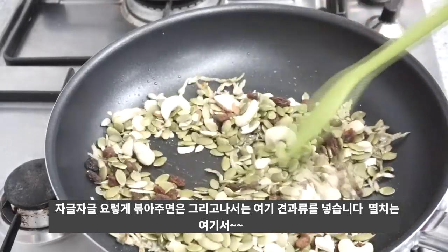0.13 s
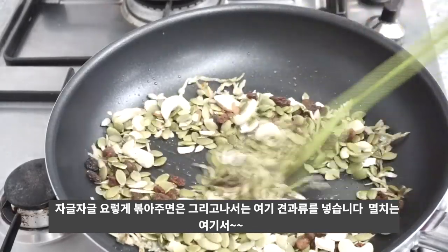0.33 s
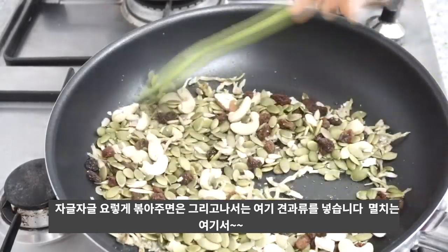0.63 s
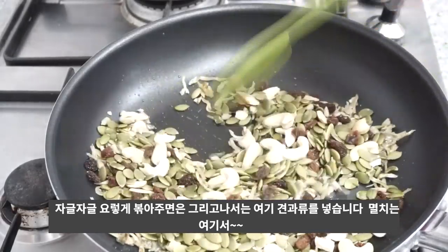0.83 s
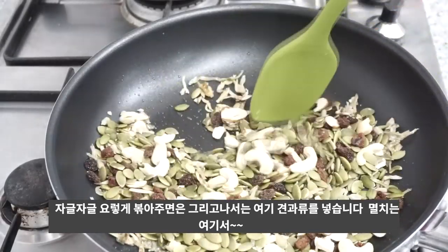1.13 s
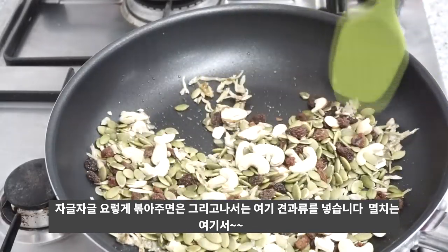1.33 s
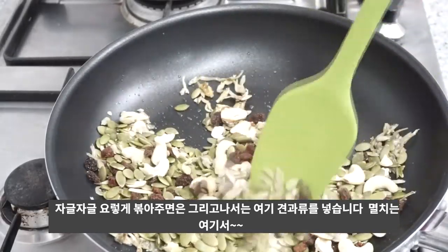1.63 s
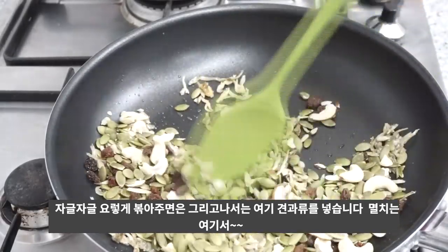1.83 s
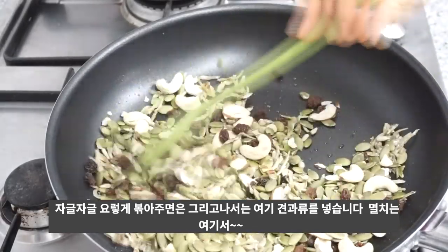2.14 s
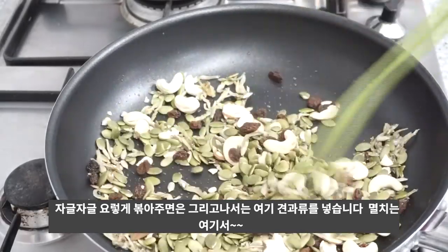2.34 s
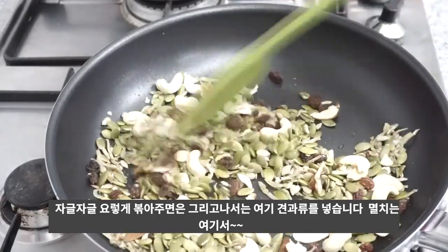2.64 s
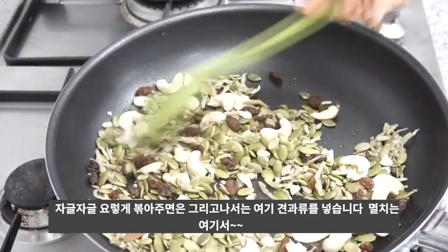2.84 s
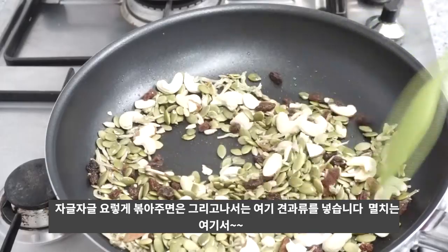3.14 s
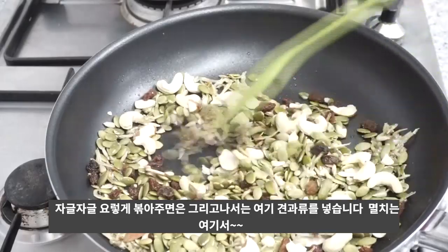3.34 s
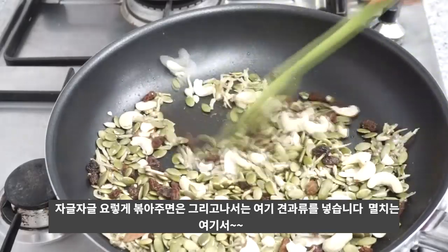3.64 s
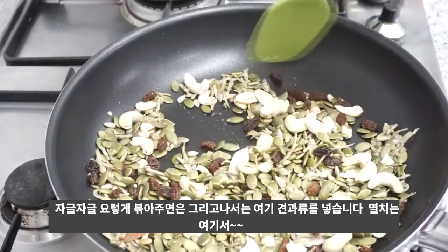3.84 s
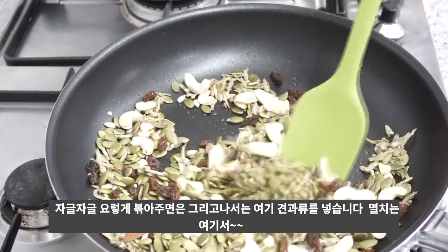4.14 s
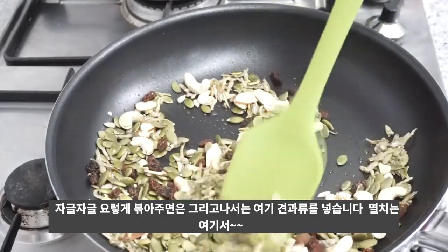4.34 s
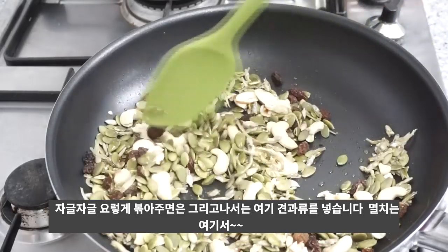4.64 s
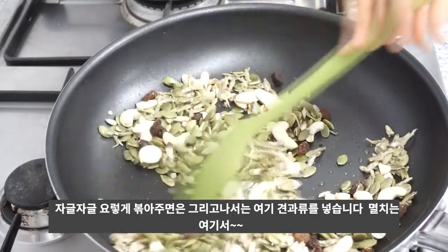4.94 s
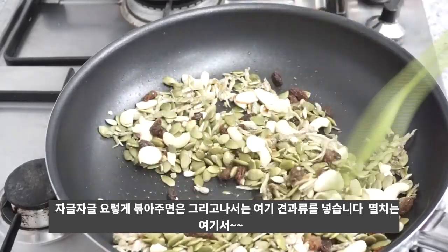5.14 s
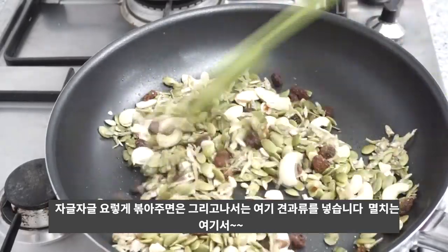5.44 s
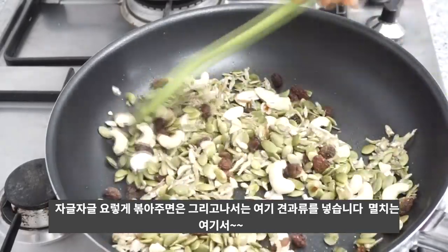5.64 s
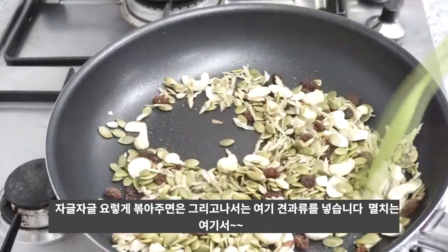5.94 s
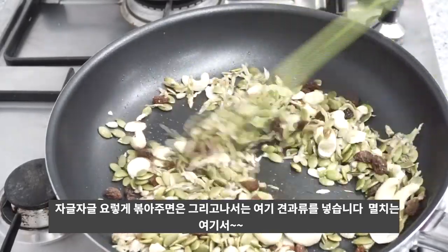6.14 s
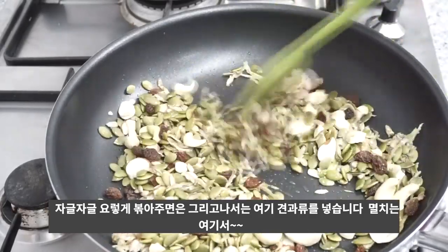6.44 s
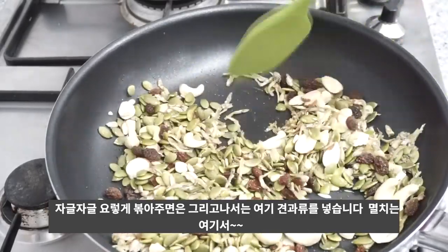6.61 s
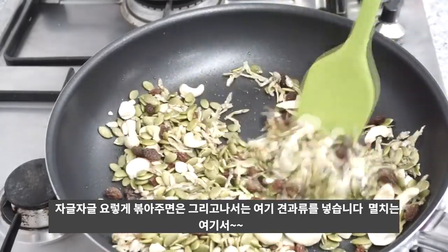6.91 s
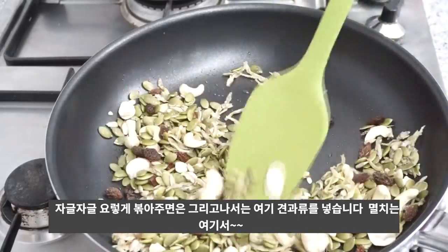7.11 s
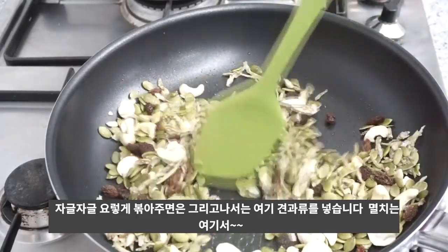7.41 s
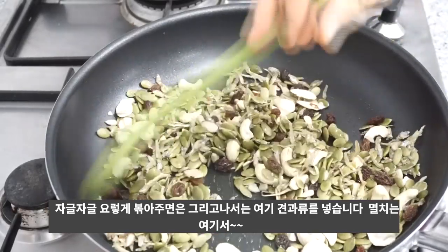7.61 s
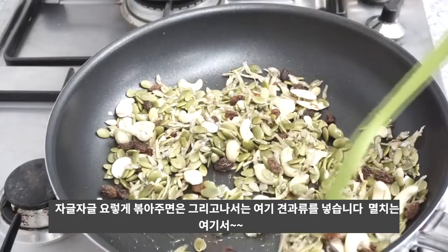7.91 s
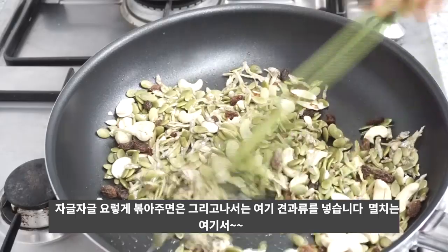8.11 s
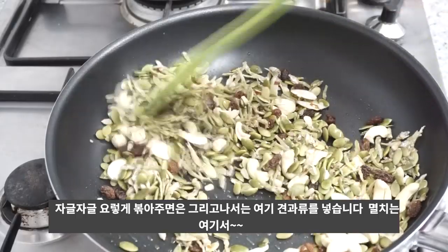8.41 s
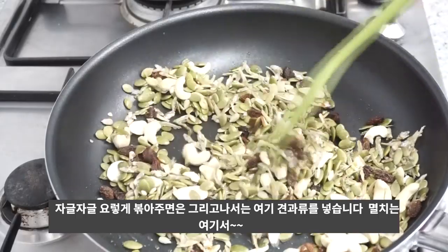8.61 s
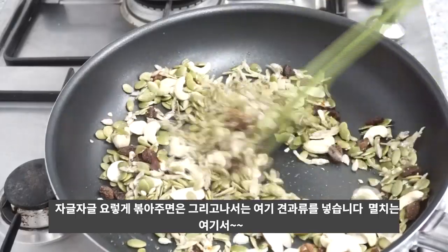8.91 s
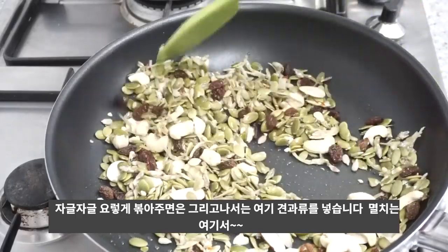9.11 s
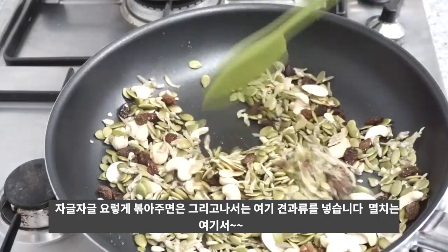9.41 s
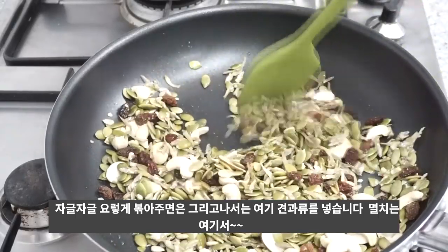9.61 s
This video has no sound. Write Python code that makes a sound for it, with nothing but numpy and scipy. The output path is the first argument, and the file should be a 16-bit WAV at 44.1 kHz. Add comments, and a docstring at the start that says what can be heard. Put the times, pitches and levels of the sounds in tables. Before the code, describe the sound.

Close-up stirring in a metal pan: irregular nutty clatter, papery seed rustle, dull spatula thuds and sharp little spits over a quiet sizzle.

```python
"""Stirring nuts in a frying pan

Nuts and small dried fish are stirred with a soft spatula in a frying pan on a gas ring.
Blade: shaken low pan modes, thudding and dragging. Nuts: random and timed contacts ring the pan floor.
Seeds and fish: rubbing grains and pitched ticks. Hot oil: dense clicks sizzle, filtered snaps spit.
Below lie low rumble and hush, shaped from noise, and the short reflections of a small kitchen."""
import sys
import numpy as np
from scipy import signal
from scipy.fft import rfft, irfft, next_fast_len
from scipy.io import wavfile

SR = 44100
rng = np.random.default_rng(int(sys.argv[2]) if len(sys.argv) > 2 else 0)


def output_pcm(signal):
    """Save a mono or channel-first signal as 16-bit PCM at the path in sys.argv[1].

    Samples are clipped to [-1, 1] before scaling.
    """
    pcm = np.clip(np.atleast_2d(signal).T, -1, 1) * 32767
    wavfile.write(sys.argv[1], SR, np.round(pcm).astype(np.int16))


def invert_db(level):
    """Linear amplitude ratio for a level in decibels (20 dB per decade), elementwise."""
    return 10 ** (np.asarray(level, dtype=float) / 20)


N = 430416


def rms_one(x):
    """Scales to rms 1."""
    return x / np.sqrt(np.mean(x ** 2) + 1e-20)


def in_time(rows):
    """Columns after the first (t/s), joined by straight lines, at every sample."""
    t_s, *columns = np.transpose(rows)
    return [np.interp(np.arange(N) / SR, t_s, column) for column in columns]


def coloured(x, points):
    """Shapes a spectrum by gains (f/Hz, level/dB) joined over log frequency."""
    size = next_fast_len(N)
    hz = np.maximum(np.fft.rfftfreq(size, 1 / SR), 1)
    point_hz, point_db = np.transpose(points)
    gain_db = np.interp(np.log(hz), np.log(point_hz), point_db)
    return irfft(rfft(x, size) * invert_db(gain_db), size)[:N]


def band(x, low_hz, high_hz):
    """Gentle band-pass."""
    return signal.sosfilt(signal.butter(2, [low_hz, high_hz], "band", fs=SR, output="sos"), x)


def drift(rate_hz):
    """Slow noise of rms 1: two equal real poles at rate_hz, run at every 40th sample."""
    step, settle = 40, 2000
    r = np.exp(-2 * np.pi * rate_hz * step / SR)
    noise = rng.standard_normal(N // step + settle + 2)
    slow = signal.lfilter([1], [1, -2 * r, r * r], noise)[settle:]
    return np.interp(np.arange(N) / step, np.arange(len(slow)), rms_one(slow))


def ring(clicks, hz, t60_s):
    """Damped mode: a unit click starts a decaying sine of height 1."""
    r, w = invert_db(-60 / (t60_s * SR)), 2 * np.pi * hz / SR
    return signal.lfilter([0, np.sin(w)], [1, -2 * r * np.cos(w), r * r], clicks + 1e-18)


def grains(per_s, spread_db):
    """Random clicks of either sign; sizes in dB follow a capped exponential law."""
    sizes = invert_db(spread_db * np.minimum(rng.exponential(1, N), 5)) * rng.choice([-1, 1], N)
    return sizes * (rng.random(N) < per_s / SR)


def add_at(out, t_s, sound):
    """Adds a short sound in place at t_s."""
    at = round(t_s * SR)
    out[at:at + len(sound)] += sound[:N - at]


def swells(crest_s, swell_s, ebb_s, db):
    """Summed power, every 2 ms, of events with a broad crest and steep ends."""
    swing_db, rounding = 20, 1.39      # swing_db is lost over one swell or ebb time
    late_s = np.arange(0, N / SR, .002)[:, None] - crest_s
    away = np.maximum(late_s / ebb_s, -late_s / swell_s)
    return np.sum(invert_db(db - swing_db * away ** rounding) ** 2, axis=1)


# blade landings on the pan floor: t/s, relative peak level/dB, rocking time/s (75 dB down),
# relative level of modes over 250 Hz/dB
THUDS = [(0.202, -26, 0.34, 23), (0.35, -37, 0.16, -26), (0.714, -31, 0.4, -27), (0.742, -39, 0.15, -4),
         (1.402, -33.5, 0.099, 17), (2.215, -37.5, 0.19, -10), (2.529, -41.5, 0.16, 7),
         (2.739, -51, 0.17, -14), (2.891, -30, 0.17, -9), (3.26, -37, 0.14, -8), (3.585, -30, 0.2, -19),
         (3.629, -40, 0.16, -21), (3.684, -46, 0.12, -10), (4, -33.5, 0.074, 9), (4.496, -36, 0.11, -8),
         (4.872, -32, 0.12, -13), (4.89, -33.5, 0.16, -18), (5.292, -44, 0.2, -13), (5.71, -35, 0.28, -19),
         (6.038, -42, 0.27, 7), (6.412, -28, 0.13, -19), (6.435, -22, 0.095, -16), (6.791, -24.5, 0.27, -1),
         (7.342, -35.5, 0.13, -2), (7.693, -27.5, 0.64, -9), (8.088, -42, 0.15, -4),
         (8.433, -30.5, 0.72, 1), (8.823, -40, 0.15, -1), (8.879, -29.5, 0.15, -10),
         (9.227, -24.5, 0.068, -11), (9.617, -27, 0.14, 9)]
# blade pushes through the heap: crest t/s, swell/s, ebb/s, relative nut rattle level/dB,
# relative seed rustle level/dB
STROKES = [(0.0, .05, 0.041, -22.5, -46), (0.12, 0.26, 0.18, -31.5, -26.5),
           (0.218, 0.068, 0.04, -22.5, -32.5), (0.34, 0.26, 0.17, -35.5, -28),
           (0.45, 0.19, 0.051, -32.5, -33.5), (0.82, 0.25, 0.32, -43, -37.5),
           (1.13, 0.086, 0.2, -43.5, -42.5), (1.6, 0.27, 0.062, -42, -45), (1.85, 0.99, 0.3, -51, -43.5),
           (2.04, 0.035, 0.17, -36.5, -33), (2.32, 0.28, 0.14, -41.5, -39.5), (2.65, 0.26, 0.3, -39, -36),
           (3.04, 0.32, 0.23, -39, -39.5), (3.3, 0.2, 0.31, -43, -41), (3.72, 0.19, 0.14, -36, -35.5),
           (4.19, 0.12, 0.085, -41.5, -40), (4.33, 0.097, .2, -44.5, -69), (4.68, 0.31, 0.19, -42.5, -44),
           (5.03, 0.11, 0.14, -40, -39.5), (5.11, 0.19, 0.085, -40, -41.5),
           (5.2, 0.031, 0.19, -43.5, -43.5), (5.41, 0.13, 0.28, -38, -39), (5.83, 0.18, 0.15, -34, -37),
           (6.12, 0.11, 0.31, -41.5, -42.5), (6.26, 0.54, 0.24, -38.5, -42), (6.57, 0.39, 0.11, -38, -43.5),
           (7.01, 0.18, 0.2, -40, -54), (7.26, 0.043, 0.15, -45, -58), (7.48, 0.15, 0.19, -35, -36),
           (7.88, 0.17, 0.24, -41.5, -36.5), (8.22, 0.21, 0.14, -36, -34.5),
           (8.61, 0.38, 0.23, -34.5, -42.5), (9.02, 0.25, 0.25, -36, -38), (9.42, 0.27, 0.14, -31.5, -39),
           (9.76, 0.2, .1, -36.5, -43)]
# seeds tumble off the blade: t/s, relative level/dB, ebb/s
SPILLS = [(0.34, -37, .04), (0.537, -31.5, 0.13), (1.096, -34.5, 0.07), (1.486, -40.5, 0.29),
          (1.922, -38, 0.1), (2.062, -28, 0.025), (2.225, -37.5, 0.15), (2.766, -35, 0.07),
          (2.955, -37, 0.081), (3.447, -28.5, 0.068), (3.535, -38.5, .07), (3.93, -41, 0.16),
          (4.503, -48, 0.15), (4.897, -42.5, 0.2), (5.597, -36.5, 0.096), (6.441, -27.5, 0.022),
          (6.617, -43, 0.048), (6.805, -43, 0.095), (7.889, -30, 0.03), (8.535, -36, 0.12),
          (9.254, -36, 0.046), (9.368, -36, 0.045), (9.617, -38, 0.035)]


def stirring():
    """Strokes, spills and landings set rattle, its upper modes, drag and rustle, in dB over time."""
    spill_rattle_db, push_drag_db = -11, -20.5               # against the spill; against the rattle
    jump_db, jump_swell_s, jump_ebb_s = -11, 0.048, 0.12     # nuts jump at a landing, against the thud
    drag_on_db, drag_swell_s, drag_ebb_s = -8.5, 0.04, 0.1   # blade drags on after it, against the thud
    rest_rattle_db, rest_rustle_db, rest_drag_db = -68, -50.5, -65.5   # heap settling between strokes
    crest_s, swell_s, ebb_s, push_db, seed_db = np.transpose(STROKES)
    spill_s, spill_db, spill_ebb_s = np.transpose(SPILLS)
    land_s, land_db = np.transpose(THUDS)[:2]

    pushed = swells(crest_s, swell_s, ebb_s, push_db)
    spilled = swells(spill_s, 0.44 * spill_ebb_s, spill_ebb_s, spill_db)
    jumped = swells(land_s + 0.024, jump_swell_s, jump_ebb_s, land_db + jump_db)
    dragged_on = swells(land_s + 0.019, drag_swell_s, drag_ebb_s, land_db + drag_on_db)
    rubbed = swells(crest_s, swell_s, 1.12 * ebb_s, seed_db)

    rattle = pushed + invert_db(spill_rattle_db) ** 2 * spilled + invert_db(rest_rattle_db) ** 2 + jumped
    drag = invert_db(push_drag_db) ** 2 * pushed + invert_db(rest_drag_db) ** 2 + dragged_on
    rustling = rubbed + spilled + invert_db(rest_rustle_db) ** 2
    levels_db = 10 * np.log10(np.c_[rattle, drag, rustling])
    rattle_db, drag_db, rustle_db = in_time(np.c_[np.arange(len(drag)) * .002, levels_db])
    hard_db = -1.54 + 0.31 * (rustle_db - rattle_db)   # more seeds against nuts: brighter
    return rattle_db, hard_db, drag_db, rustle_db


# low modes of the pan on its grate: f/Hz, level/dB, t60/s before scaling
PAN_LOW = [(95, 4, 0.15), (168.6, 3.5, 0.14), (209, 6.5, 0.1), (280, -2.5, 0.088), (335, -6, 0.1),
           (404, -13, 0.07), (494, 1.5, 0.088)]


def blade(drag_db):
    """The soft blade judders over the pan floor and shakes its low modes; each landing is a dull thud."""
    judder = grains(600.0, spread_db=-0.5)
    drag = sum(invert_db(db) * ring(judder, hz, 0.38 * t60_s) for hz, db, t60_s in PAN_LOW)
    out = invert_db(drag_db - 0.65) * rms_one(band(drag, 111, 610))
    t = np.arange(int(.3 * SR)) / SR
    shakes = rng.standard_normal((len(THUDS), len(t)))
    for (land_s, peak_db, rock_s, upper_db), shake in zip(THUDS, shakes):
        rocking = 0.59 * shake * invert_db(-75.0 * t / max(rock_s, .02))
        push = 17.0 * (t == 0) + rocking      # the blow, then the pan rocks on the grate
        thud = np.zeros(len(t))
        for hz, db, t60_s in PAN_LOW:
            mode_db = db + (hz > 250) * (upper_db + 14.5)
            thud += invert_db(mode_db) * ring(push, hz, 0.74 * t60_s)
        thud = band(thud, 77, 730)
        add_at(out, land_s, invert_db(peak_db + 0.8) * thud / np.abs(thud).max())
    return out


# nuts knock on the metal: t/s, relative peak level/dB, relative brightness/dB, centre f/Hz
KNOCKS = [(0.166, -7.5, -38, 1150), (0.201, -8.5, -38, 1210), (0.221, -15, -38, 1290),
          (0.324, -14, 3, 1900), (0.83, -24, -13, 1200), (0.861, -26, -15, 1000), (0.962, -30, -8, 2000),
          (1.089, -23, 0, 2600), (0.74, -15, -12, 1160), (1.096, -16.5, -5, 2000), (1.128, -21.5, -5, 2000),
          (1.167, -29, -8, 1300), (1.277, -30, -5, 1170), (1.403, -16.5, -5, 1600), (2.019, -7, -20, 1850),
          (2.043, -15, -8, 1300), (2.06, -11.5, -21, 1900), (2.08, -17, -16, 1900), (2.115, -19, -10, 2000),
          (2.205, -19, -5, 3000), (2.365, -23, -2, 2300), (2.678, -19, -6, 3200), (2.331, -20.5, -6, 2390),
          (2.476, -25, -6, 1910), (2.508, -26, 0, 2240), (2.892, -26, -17, 1720), (2.914, -20, -24, 1020),
          (3.416, -20, -20, 1310), (3.43, -11.5, -7, 1950), (3.45, -16, -5, 2000), (3.53, -28, -3, 1120),
          (3.591, -22.5, -30, 1030), (3.713, -19, -21, 1320), (3.913, -15.5, -7, 2000),
          (4.002, -17.5, -7, 1690), (4.172, -22, -2, 2070), (4.195, -24, -4, 2600), (4.22, -23.5, -8, 980),
          (4.49, -24, -2, 1350), (4.713, -24, 0, 3000), (4.872, -25, -13, 1720), (4.891, -20, -8, 1690),
          (5.179, -23, -17, 2290), (5.2, -18, -3, 2300), (5.221, -22, -2, 3200), (5.398, -23, -18, 850),
          (5.549, -24.5, -18, 815), (5.594, -21, -2, 3100), (5.634, -26, -2, 3100),
          (5.688, -24.5, -6, 1140), (6.384, -23, -11, 1230), (6.397, -23, -13, 1150),
          (6.4164, -13.5, -33, 980), (6.434, -8.5, -3, 1200), (6.44, -9.5, -14, 900), (6.45, -16, -5, 1300),
          (6.472, -17, -11, 1100), (6.493, -21, 0, 3100), (6.535, -21, -20, 1000), (6.591, -32, -15, 1200),
          (6.617, -36, 2, 3000), (6.669, -29, -1, 2300), (6.776, -24, -25, 972), (6.7941, -9.5, -10, 1100),
          (6.8, -12.5, -12, 1000), (6.811, -21, -15, 850), (6.828, -24, -12, 900),
          (6.857, -24.5, -19, 1700), (7.011, -19, -17, 1100), (7.058, -24.5, -16, 1090),
          (7.069, -24.5, -7, 2000), (7.13, -22.5, -15, 912), (7.204, -24.5, -38, 970),
          (7.226, -16.5, -12, 960), (7.2672, -14.5, -8, 945), (7.703, -15.5, -18, 1140),
          (7.724, -21, -6, 1700), (7.765, -23, -12, 1700), (7.853, -19.5, -2, 2450), (7.886, -18, -7, 2300),
          (8.0, -26, -6, 2300), (8.197, -18.5, -2, 2300), (8.317, -26, -16, 1100), (8.392, -25, -27, 1170),
          (8.427, -22.5, -13, 2490), (8.459, -14.5, -18, 900), (8.494, -25, -25, 1000),
          (8.516, -28, -13, 2000), (8.566, -18, -6, 2200), (8.598, -21, -8, 1900), (8.663, -22, -21, 2280),
          (8.677, -19, -9, 2300), (8.697, -21, -16, 1100), (8.722, -23, -22, 1140), (8.776, -26, -17, 1130),
          (8.887, -19, -42, 910), (9.021, -14.5, -20, 1080), (9.191, -27, -23, 1100),
          (9.228, -13, -55, 970), (9.249, -9, -12, 1050), (9.26, -20, -20, 1200), (9.285, -15.5, -36, 912),
          (9.354, -17, -3, 1000), (9.41, -14.5, -6, 2000), (9.377, -16, 0, 3000), (9.446, -20, -3, 2100),
          (9.529, -25.5, -9, 3400), (9.539, -22.5, -14, 1150), (9.59, -22, -1, 1900),
          (9.601, -20.5, -21, 970), (9.621, -10, -11, 1070)]
# pan floor modes under the nuts: f/Hz, level/dB, t60/s before scaling
PAN = [(609, -14.5, 0.18), (732, 0.5, 0.084), (879.4, 0, 0.083), (980, 6, 0.031), (1120, 10, 0.026),
       (1290, 6.5, 0.039), (1366, 3.5, 0.034), (1704, 3, 0.039), (1881, 1, 0.078), (2000, 7, 0.028),
       (2310, 4, 0.047), (2517, -3, 0.054), (2806, -0.5, 0.048), (3116, 5, 0.036), (3417, -0.5, 0.043),
       (3850, 1.5, 0.034), (4320, -1.5, 0.032), (5040, -2, 0.064)]


def nuts(rattle_db, hard_db):
    """Clumped small contacts and hard knocks with a short clatter ring the same pan modes."""
    contacts = grains(700.0 * invert_db(3.0 * drift(18.0)), spread_db=1.5)
    place = rng.integers(0, 3, N)      # each of three places on the pan excites other modes
    rung = []
    for k, (hz, db, t60_s) in enumerate(PAN):
        moving = contacts * (place == k % 3) * invert_db(3.27 * drift(3.45))   # the heap keeps moving
        rung.append(invert_db(db) * ring(moving, hz, (0.3 + 0.16 * (hz > 1800)) * t60_s))
    rung = np.array(rung)
    low = np.array(PAN)[:, 0] < 1550
    lower, upper = rms_one(rung[low].sum(0)), rms_one(rung[~low].sum(0))
    out = invert_db(rattle_db - 2.0) * (lower + invert_db(hard_db) * upper)

    t = np.arange(int(.12 * SR)) / SR
    shape = len(KNOCKS), len(t)
    bounces = rng.standard_normal(shape) * (rng.random(shape) < 1500.0 / SR)
    strengths_db = rng.normal(0, 2.5, (len(KNOCKS), len(PAN)))
    for (knock_s, peak_db, bright_db, centre_hz), bounce, strength_db in zip(KNOCKS, bounces, strengths_db):
        clatter_s = 0.0043 * invert_db(0.15 * (peak_db + 23.5))      # harder blows clatter longer
        push = (t == 0) + 0.35 * bounce * np.exp(-t / clatter_s)
        # the contact itself, 10 dB down, then the ring
        knock = invert_db(-10) * band(push, .5 * centre_hz, 2 * centre_hz) * SR / centre_hz / 6
        for k, (hz, db, t60_s) in enumerate(PAN):
            upper = np.clip(np.log2(hz / 1900), 0, 1)      # hard contacts reach the upper modes
            # nut size and landing place favour some modes
            near_db = -13.0 * min(abs(np.log2(hz / centre_hz)), 1)
            mode_db = db + near_db + upper * (bright_db + 14.0) + strength_db[k]
            mode_hz = hz * invert_db(0.062 * strength_db[k - 1])
            knock = knock + (-1) ** k * invert_db(mode_db) * ring(push, mode_hz, 0.5 * t60_s)
        add_at(out, knock_s, invert_db(peak_db - 3.5) * knock / np.abs(knock).max())
    return band(out, 720, 5500)


# rustle spectrum: f/Hz, relative level/dB
RUSTLE = [(1500, -26), (2500, -5), (4000, -4.5), (6000, 2), (8000, -3), (10000, -8.5), (13000, -12.5),
          (15700, -18), (16100, -50)]


def rustle(rustle_db):
    """Dry seeds and fish rub and tick; each tick rings a few cycles at one of 14 pitches."""
    rubbing = grains(7000.0 * invert_db(4.1 * drift(30.0)), spread_db=1.5)
    ticks = grains(380.0 * invert_db(4.5 * drift(15.0)), spread_db=2.5)
    pitches_hz, dealt = np.geomspace(2200, 12000, 14), rng.integers(0, 14, N)
    rung = np.zeros(N)
    for k, hz in enumerate(pitches_hz):
        rung += band(ticks * (dealt == k) + 1e-18, 0.7 * hz, 1.16 * hz) / np.sqrt(hz)
    mix = rms_one(rubbing) + invert_db(-4.0) * rms_one(rung)
    return invert_db(rustle_db - 0.58) * rms_one(coloured(mix, RUSTLE))


# oil spits and dry ticks: t/s, relative peak level/dB, centre f/Hz, relative top band level/dB
SPITS = [(0.0446, -14, 5850, -3), (0.1209, -20, 6200, -20), (0.1369, -12, 6250, -26),
         (0.19, -16, 5500, -25), (0.212, -11, 6540, -20), (0.279, 2, 5970, 2.5), (0.3205, -9, 7600, -20),
         (0.3385, -2.5, 6530, -11), (0.357, -4, 5030, -10), (0.4028, -6.5, 7000, -15),
         (0.431, -15, 7600, -26), (0.437, -14, 6500, -26), (0.5152, -24, 5400, -26),
         (0.5364, -16, 5500, -20), (0.5667, -15.5, 6200, -16), (0.6147, -17, 8200, -5),
         (0.7739, -10, 6200, -10), (0.8314, -10.5, 7750, -12), (0.9056, -18, 6700, -33),
         (0.948, -13.5, 5270, -10), (1.1276, -18, 6800, -6), (1.308, -22, 7100, -18),
         (1.4473, -14, 6500, -14), (1.5236, -20, 5700, -20), (1.732, -24, 7500, -18),
         (1.7987, -12.5, 7000, -12), (1.8972, -15, 5600, -24), (2.0559, -11, 5700, -22),
         (2.0706, -10, 7400, -11), (2.155, -25, 5750, -20), (2.1876, -22, 6700, -20),
         (2.4679, -19, 6700, -17), (2.5089, -17, 5100, -25), (2.767, -17, 7000, -26),
         (2.783, -7, 8600, -17), (2.8706, -24, 5300, -20), (3.0003, -18, 4670, -22),
         (3.127, -23, 5700, -20), (3.153, -17.5, 6400, -20), (3.2983, -17, 6140, 0),
         (3.315, -18, 9200, -19), (3.4163, -21, 5150, -22), (3.4303, -9, 5500, -25),
         (3.6468, -14.5, 6700, -14), (3.692, -13.5, 6100, -26), (3.781, -20, 4900, -22),
         (3.791, -25, 4400, -25), (3.8778, -19.5, 5900, -29), (3.9408, -17, 7100, -15),
         (4.042, -10.5, 6800, 2), (4.159, -22, 4900, -25), (4.174, -20, 6000, -20),
         (4.23, -10.5, 9300, -10), (4.356, -35, 10000, -8), (4.3966, -31, 4600, -20),
         (4.4202, -28, 8100, -11), (4.476, -29, 5000, -22), (4.494, -22, 5500, -20),
         (4.5221, -16, 7300, -3), (4.5711, -22, 7900, 4), (4.878, -22, 8400, -12), (5.1, -25, 7500, -15),
         (5.113, -19, 7900, -4), (5.1861, -17, 8400, -7), (5.2018, -12.5, 6140, -32),
         (5.2424, -20, 8600, -9), (5.2906, -20.5, 5100, -20), (5.439, -27, 5000, -20),
         (5.5566, -17, 7100, -22), (5.58, -22, 8000, -18), (5.611, -23, 7000, -18),
         (5.6597, -25, 5100, -18), (5.8345, -19, 6200, -20), (6.1201, -15.5, 7500, -10),
         (6.318, -13.5, 6200, -15), (6.4034, -14.5, 7600, -19), (6.4385, -17, 5800, -26),
         (6.6175, -13, 5470, -22), (6.6707, -10, 7060, -1), (6.7971, -12.5, 5200, -21),
         (6.8675, -21, 7000, -18), (7.0078, -16, 7760, -10), (7.0732, -18, 7840, -10),
         (7.5385, -36, 6370, -17), (7.5704, -22, 5660, -20), (7.6733, -16.5, 4700, -30),
         (7.959, -15, 5540, -27), (8.1101, -15.5, 6640, -1), (8.1378, -18, 7900, -12),
         (8.331, -19, 6000, -20), (8.5086, -12, 6660, -6.5), (8.6582, -16, 6050, -6),
         (8.709, -24, 8100, -15), (8.749, -29, 6000, -18), (8.8255, -24, 6200, -18),
         (8.8483, -21.5, 7500, 4), (8.9915, -12, 7700, -19), (9.0433, -13.5, 7200, -20),
         (9.1074, -23, 5800, -20), (9.1485, -13.5, 5900, -5), (9.2373, -20, 7000, -2),
         (9.379, -10.5, 5870, -35), (9.446, -18, 5200, -20), (9.468, -21, 7300, -18),
         (9.487, -17.5, 5540, -18), (9.5128, -7, 6130, 2), (9.5528, -11.5, 7840, -14),
         (9.6234, -16, 5500, -24)]
# echoes off the pan floor and wall: lag t/s, level/dB
WALL_ECHOES = [(.0004, -8), (.0015, -13), (.0021, -13)]


def spits():
    """A snap of two or three cycles, its echoes inside the pan and a short spray of droplets after it."""
    t, out = np.arange(int(.03 * SR)) / SR, np.zeros(N)
    # 24 small ones at random: ranges in SPITS columns
    low, high = np.transpose([(0, N / SR), (-33, -26), (5500, 7500), (-18, -10)])
    rows = np.r_[SPITS, low + (high - low) * rng.random((24, 4))]
    sprays = rng.standard_normal((len(rows), len(t)))
    click = 1. * (t == 0)
    for lag_s, echo_db in WALL_ECHOES:
        click[round(lag_s * SR)] += invert_db(echo_db)
    for (spit_s, peak_db, hz, top_db), spray in zip(rows, sprays):
        spray_level = invert_db(-14.0) * np.exp(-t / .0002) + invert_db(-27.0) * np.exp(-t / .006)
        burst = click + spray * spray_level
        body = band(burst, 0.65 * hz, min(1.373 * hz, 17000))
        snap = body + invert_db(top_db - 2.2) * band(burst, 10900, 14600)
        add_at(out, spit_s, invert_db(peak_db + 0.47) * snap / np.abs(snap).max())
    return out


# sizzle spectrum: f/Hz, relative level/dB
SIZZLE = [(1500, -31), (2500, -19), (4000, 1), (6000, 0), (8000, 3), (10000, -1), (13000, -6),
          (15700, -8.5), (16100, -53)]


def sizzle():
    """Thousands of tiny bursts a second in the oil film, coming in slow clumps."""
    fine = grains(9000.0 * invert_db(3.9 * drift(12.0)), spread_db=5.0)
    return invert_db(-46.5) * rms_one(coloured(fine, SIZZLE))


# rumble course: t/s, level/dB
RUMBLE = [(0.0, -51.5), (2.12, -63), (3.04, -51.5), (3.18, -60.5), (6.87, -54.5), (6.96, -48), (7.04, -60),
          (9.27, -50.5), (9.76, -59)]


def rumble():
    """Lumpy low noise from the stove."""
    noise = band(band(band(rng.standard_normal(N), 33.4, 66.0), 35.0, 92), 36.0, 104)
    return invert_db(in_time(RUMBLE)[0] + 2.5 * drift(4.6)) * rms_one(noise)


# hush spectrum: f/Hz, relative level/dB
AIR = [(53, -52), (90, -8), (563, -9.5), (789, 4), (1030, -9), (1110, 2.5), (1510, -13), (1820, -32),
       (2050, -39), (2440, -18), (3000, -64), (3900, -57), (6600, -120)]


def steady_air():
    """The even hush of flame and room: noise of fixed spectrum."""
    return invert_db(-56) * rms_one(coloured(rng.standard_normal(N), AIR))


def kitchen(x, t60_s):
    """Dense reflections of hard walls, dying evenly."""
    t = np.arange(int(.4 * SR)) / SR
    tail = rng.standard_normal(len(t)) * invert_db(-60 * t / t60_s) * (t > .001)
    # the tail is cut above 15.8 kHz
    tail = signal.sosfilt(signal.cheby2(10, 50, 15800, fs=SR, output="sos"), tail)
    return signal.fftconvolve(x, tail / np.sqrt(np.sum(tail ** 2)))[:N]


# spectrum of the side signal: f/Hz, gain level/dB
WIDTH = [(40, -13), (150, -18.5), (300, -14.5), (600, -20), (1500, -21), (3000, -11), (4500, -10),
         (7500, -8.5), (9000, -8.5), (15000, -9.5)]


def scene():
    """All sits in front; seeds and oil give each ear treble of its own; the bass sways a little."""
    rattle_db, hard_db, drag_db, rustle_db = stirring()
    thuds, clatter, snaps = blade(drag_db), nuts(rattle_db, hard_db), spits()
    hush = steady_air() + rumble()
    struck = clatter + snaps
    mid = thuds + struck + hush + sizzle() + rustle(rustle_db)
    mid = mid + invert_db(-9) * kitchen(struck, t60_s=0.085)
    sway = (thuds + hush) * drift(8.0)
    spread = sizzle() + rustle(rustle_db) + kitchen(struck, t60_s=0.034) + sway
    # snaps lean slightly to one side, all by the same amount
    side = coloured(spread, WIDTH) + invert_db(-24) * band(snaps, 4100, 11000)
    return mid + side * [[1], [-1]]


def band_limit(x):
    """A steep low-pass at the top of the band."""
    return signal.sosfilt(signal.butter(12, 16980, fs=SR, output="sos"), x)


def record(dry):
    """Rounds off the highest peaks, then cuts the top above 16.9 kHz."""
    ceiling = .95
    rounded = ceiling * np.tanh(dry / ceiling)
    mix = signal.sosfilt(signal.cheby2(12, 70, 16900, fs=SR, output="sos"), rounded)
    return band_limit(mix)


dry = scene()
out = record(dry)
output_pcm(out)
```